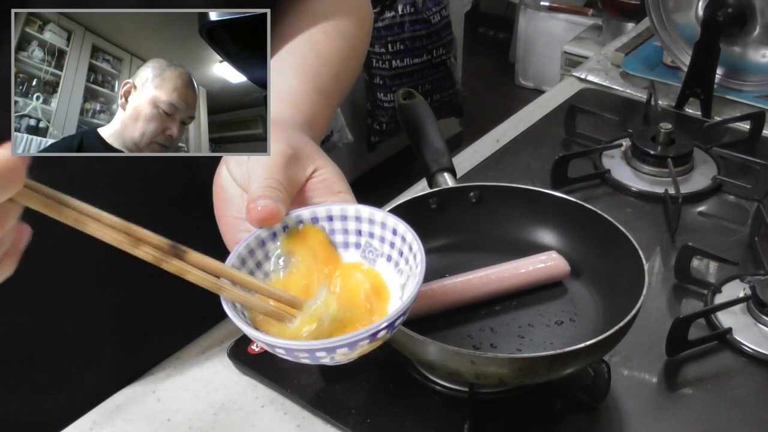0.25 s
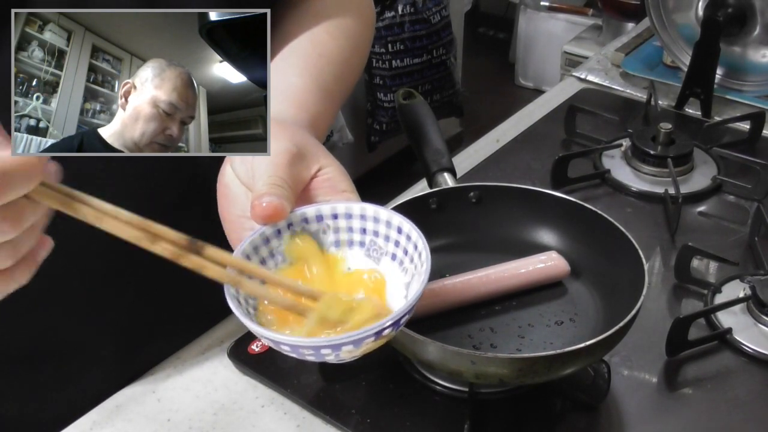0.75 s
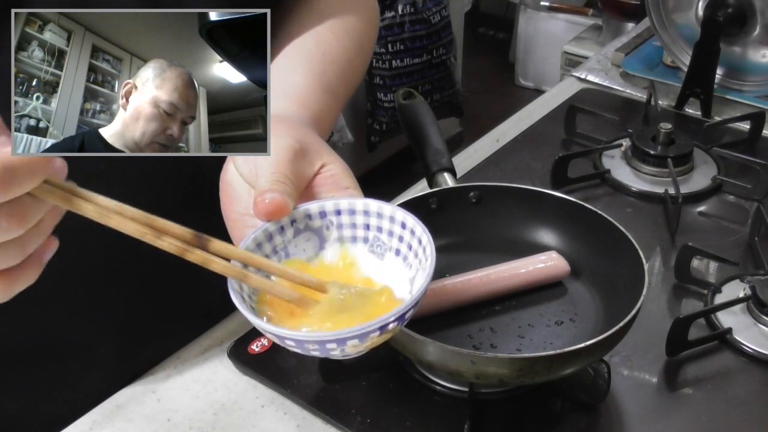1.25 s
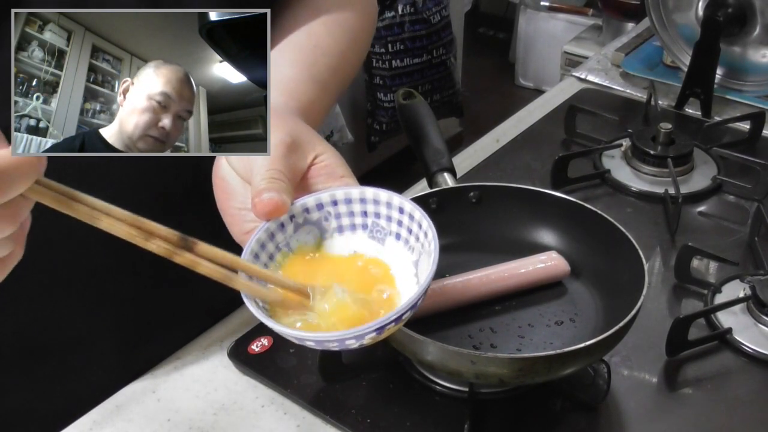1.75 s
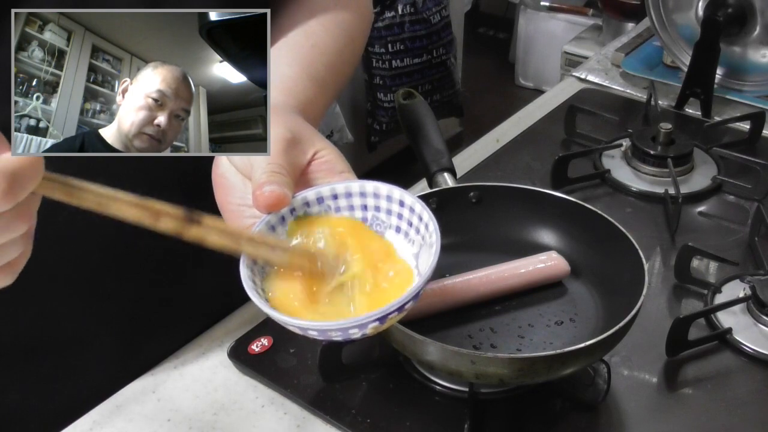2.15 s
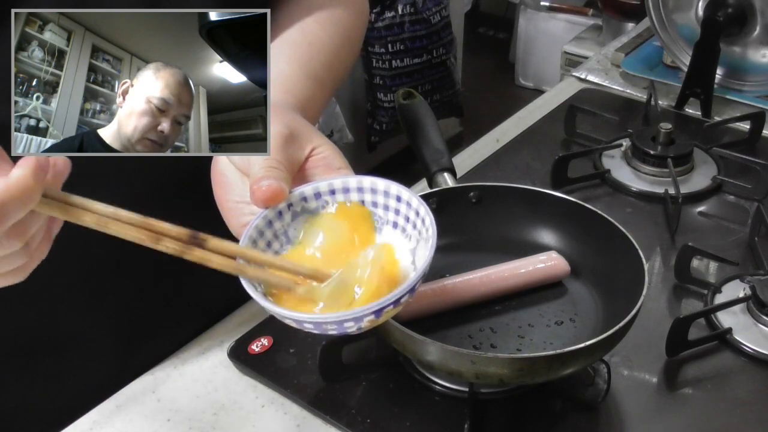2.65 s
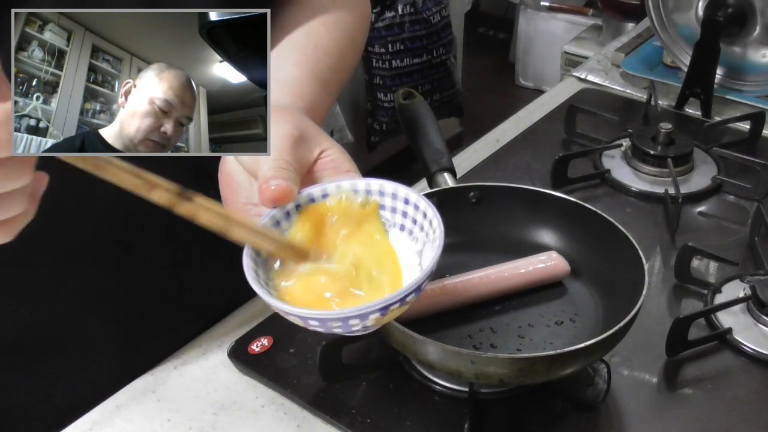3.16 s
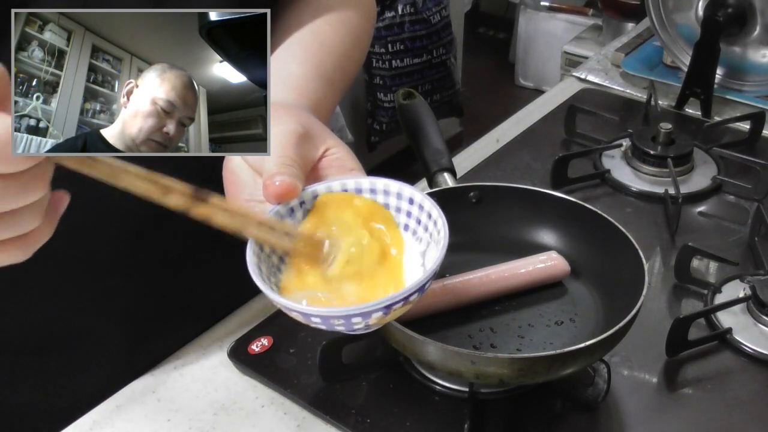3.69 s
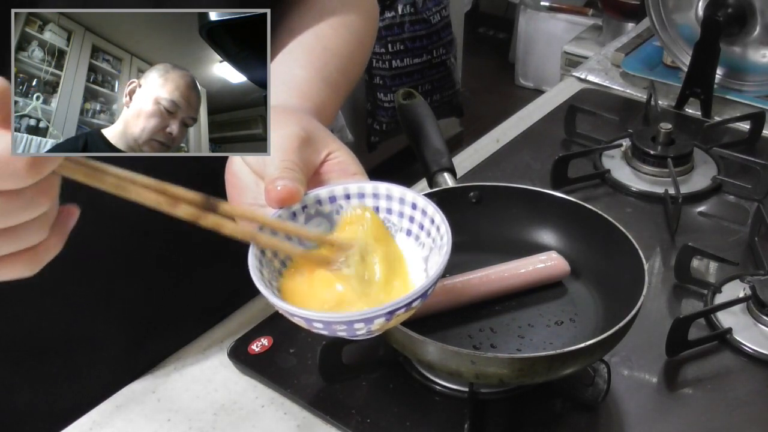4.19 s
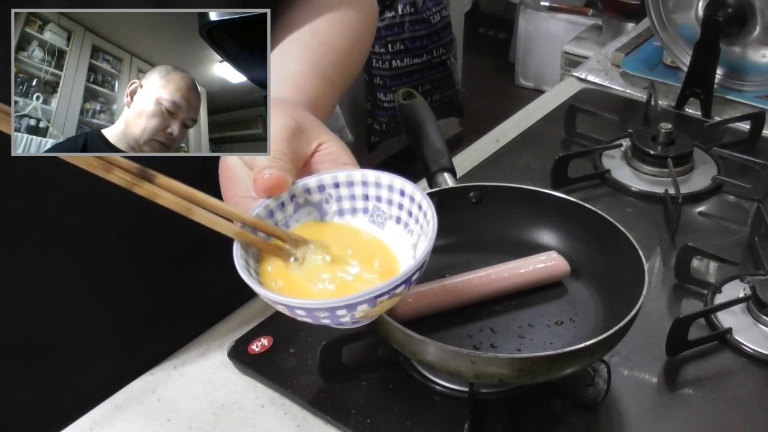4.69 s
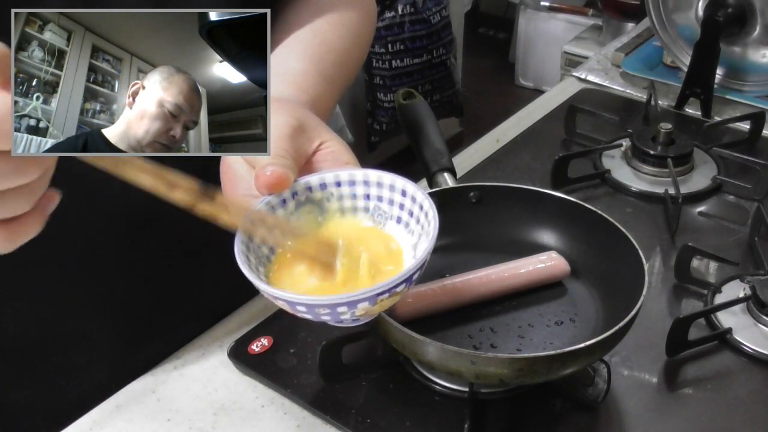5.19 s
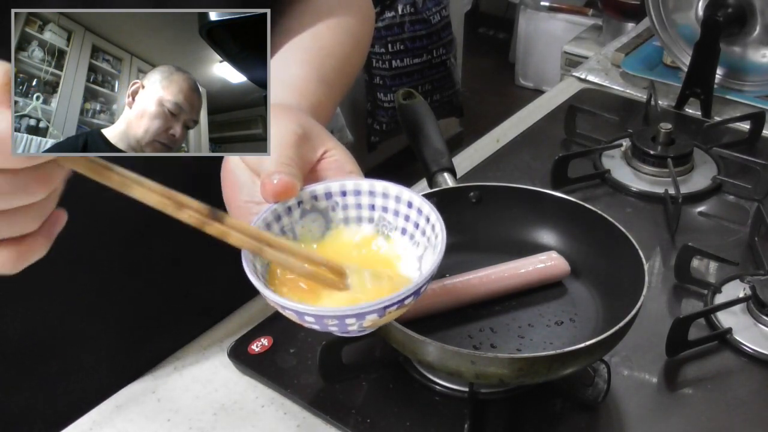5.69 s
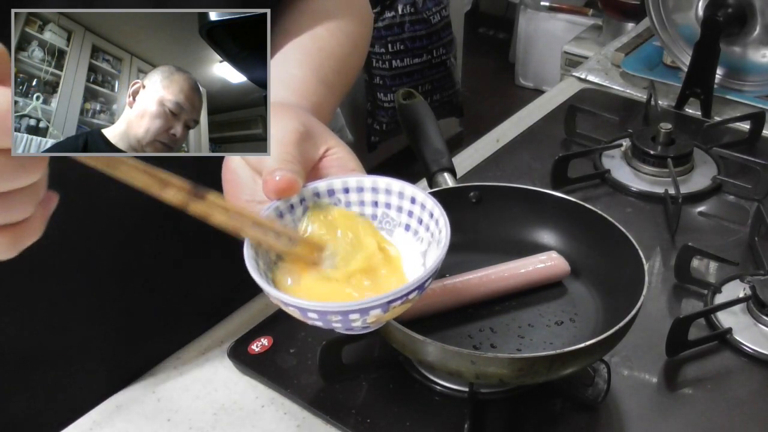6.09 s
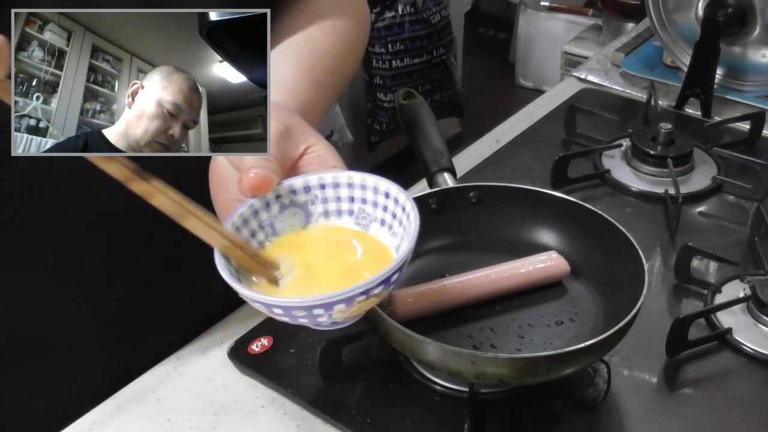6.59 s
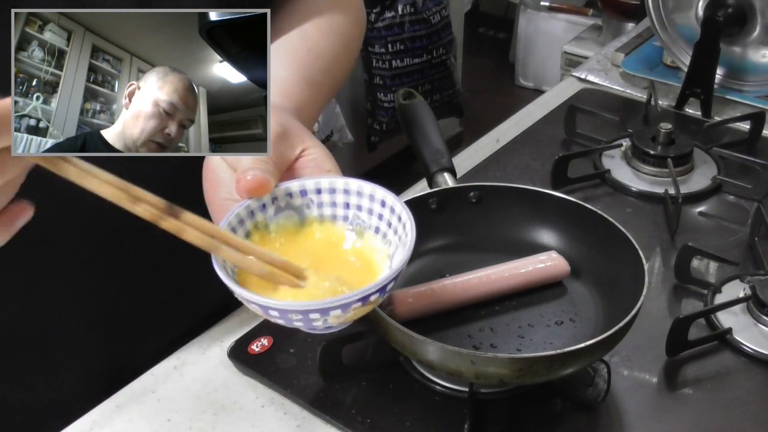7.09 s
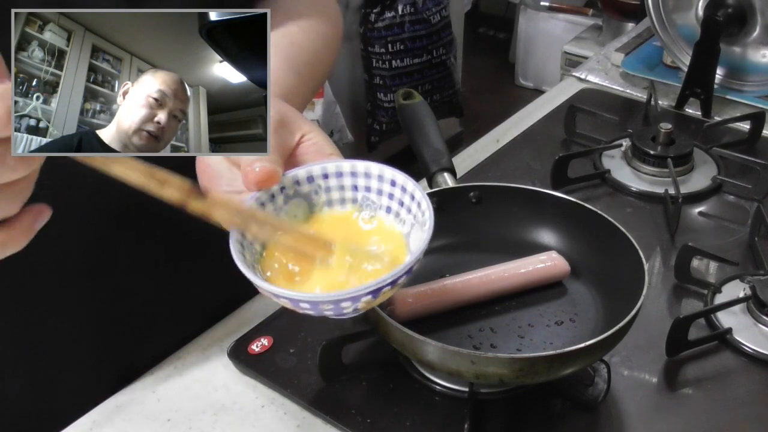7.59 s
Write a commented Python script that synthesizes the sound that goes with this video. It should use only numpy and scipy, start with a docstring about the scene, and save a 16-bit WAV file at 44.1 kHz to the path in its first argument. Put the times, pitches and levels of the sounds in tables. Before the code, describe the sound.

Oil sizzles in a frying pan from the start, a steady high fizz with fine crackle and scattered sharp spits. At once, wooden chopsticks begin beating a raw egg in a hand-held porcelain bowl, about six strokes a second. Each stroke is a bright, quickly damped click of varying strength, mixed with wet squelches, little slaps and gulps of air. Around 2.5 seconds the clicks pause while the egg keeps sloshing; the oil spits its loudest near 2.9 seconds, and the clicks return at 3. They pause again from about 4.5 to 5.1 seconds as the sizzle swells slightly, then run on until the end, near 8 seconds. A clear wet blip and another sharp spit come near 5.8 seconds. The bowl is close to the microphone, with the pan just behind it, and the small kitchen adds a short echo.

```python
"""Oil sizzles in a frying pan from the start, as countless tiny steam bubbles burst.
At once, wooden chopsticks begin beating a raw egg in a hand-held porcelain bowl, about six strokes
a second: the sticks click on the bowl and the egg gulps air. The clicks pause near 2.5 seconds,
the oil spits its loudest, and they return. They pause again near 4.5 seconds, then run to the end.
All along, a small kitchen echoes and the microphone's gain control tames the loudest clicks."""
import sys
import numpy as np
from scipy import signal
from scipy.fft import rfft, irfft
from scipy.io import wavfile
from scipy.ndimage import uniform_filter1d, minimum_filter1d

SR = 44100
rng = np.random.default_rng(int(sys.argv[2]) if len(sys.argv) > 2 else 0)


def wav_out(sig):
    """Save sig, one row per channel (or a flat mono array), as 16-bit PCM at SR to the path in sys.argv[1]."""
    wavfile.write(sys.argv[1], SR, np.round(np.clip(np.atleast_2d(sig).T, -1, 1) * 32767).astype(np.int16))


N = 346185

# The kitchen's echo. Each row: frequency in Hz, seconds to fade by 60 dB.
ECHO_TIMES = [(200, 0.16), (1500, 0.08), (4000, 0.27), (8000, 0.16), (16000, 0.17)]
# How the high fizz of the frying swells and sinks. Each row: time in seconds, level in dB.
FIZZ_LEVELS = [(0.0, -17), (0.16, -19), (0.5, -20), (1.3, -20.5), (1.9, -21.5), (2.57, -19), (3.0, -20),
               (3.2, -20.5), (4.2, -20.5), (4.72, -19), (4.92, -17), (5.1, -19), (5.6, -22), (6.0, -20),
               (6.33, -20), (6.65, -22), (7.15, -20.5), (7.85, -24)]
# The tone of that fizz. Each row: frequency in Hz, level in dB.
FIZZ_TONE = [(2800, -39), (4500, -20.5), (4900, -15.5), (5400, -13.5), (5850, -6), (7200, -1.5), (8100, -2),
             (9000, -3.5), (10500, -7.5), (11800, -13.5), (15500, -16)]
# How the wash, a lower rush of frying, swells and sinks. Each row: time in seconds, level in dB.
WASH_LEVELS = [(0.0, -30), (0.8, -32), (1.9, -34.5), (2.55, -29.5), (3.0, -33), (4.0, -34.5), (4.5, -31.5),
               (4.9, -31.3), (5.5, -34), (6.8, -36.5), (7.11, -33), (7.85, -39)]
# The tone of that wash. Each row: frequency in Hz, level in dB.
WASH_TONE = [(20, -22), (60, -26), (250, -28), (500, -24), (750, -20), (1000, -9.5), (1250, -7), (1450, -1),
             (2200, -0.5), (3200, -0.5), (4300, 2), (5000, 0.5), (6000, -7), (9000, -42)]
# Where the pan rings. Each row: frequency in Hz, width in Hz, boost in dB.
PAN_RESONANCES = [(1426, 250, 6.7), (1596, 87, 6.1), (2490, 260, 4.7), (2800, 140, 7.8), (3580, 330, 8.4),
                  (4105, 490, 5.4), (4830, 110, 5.1), (6460, 110, 3.4), (7800, 180, 2.1)]
# The main spits of the oil. Each row: start in seconds, strength in dB.
OIL_SPITS = [(0.0962, 10.5), (0.3173, 1), (0.4342, 0), (1.2223, 5.5), (1.654, 1.5), (2.1534, 10.5),
             (2.37, -6), (2.8936, 13), (2.9455, -2.5), (2.896, 14.5), (3.1773, -2), (4.115, 7),
             (4.8902, -13), (5.013, 5), (5.297, 2), (5.408, 2), (5.7658, 1.5), (5.8448, 10), (7.3473, -1),
             (7.427, 2), (7.8273, -2.5)]
# The tone of a spit. Each row: frequency in Hz, level in dB.
SPIT_TONE = [(50, -39), (700, -28), (1500, -37.5), (3000, -6), (5300, -0.5), (7500, 11.5), (10000, 5.5),
             (12000, -6), (15500, -4.5)]
# The loudest slaps of the sticks parting the egg. Each row: start in seconds, strength in dB.
EGG_SLAPS = [(.034, -18.5), (.251, -16), (2.724, -21.5), (2.853, -20.5), (3.527, -20), (3.704, -22),
             (3.928, -15), (4.047, -15.5), (4.108, -21), (4.858, -19), (4.977, -17), (5.996, -15.5),
             (6.104, -14), (6.678, -21), (7.339, -20.5)]
# The tone of a slap. Each row: frequency in Hz, level in dB.
SLAP_TONE = [(100, -44), (550, -26), (850, -12), (1300, -0.5), (1900, 7), (2400, -2), (3000, 3),
             (4200, -17), (8000, -15), (16000, -52)]
# The largest air pockets closing in the egg. Each row: start in seconds, level in dB, pitch in Hz,
# octaves the pitch climbs by the time the note is loudest.
AIR_POCKETS = [(0.253, -23.5, 1280, 0.035), (0.777, -18, 796, 0.21), (0.777, -12, 1220, 0.37),
               (0.799, -18.5, 1234, 0.041), (0.813, -20, 1820, .02), (0.913, -16, 1900, 0.003),
               (1.223, -7.5, 1905, 0), (1.512, -15.5, 1720, 0.14), (2.33, -15, 1630, 0.045),
               (2.343, -19, 1580, 0), (2.41, -17.5, 1860, 0), (2.434, -17, 1790, 0.022),
               (2.493, -14.5, 1926, 0.017), (2.655, -8.5, 1946, 0), (2.817, -13.5, 1990, 0),
               (2.838, -25, 790, 0.087), (2.85, -28, 738, 0), (3.617, -17.5, 1870, 0.0096),
               (3.738, -11, 1890, 0.064), (4.094, -28, 1020, 0.035), (4.21, -15, 1930, 0),
               (4.329, -19, 1305, 0), (4.373, -16.5, 2000, 0.029), (4.39, -14, 1800, 0.056),
               (5.313, -18.5, 1014, 0.032), (5.494, -38.5, 720, .02), (5.684, -20, 1570, 0.017),
               (5.824, -1, 1720, 0.08), (6.104, -20, 1970, 0.047), (7.239, -31, 894, .02),
               (7.598, -17, 1860, 0)]
# The sticks knocking on the bowl. Each row: start in seconds, strength in dB, share from 0 to 1 that
# rings the rim rather than the wood, extra dB for the bowl's low notes, damping (2 fades twice as
# fast), pitch of the wood in Hz.
STICK_KNOCKS = [(0.0836, -18, 0, -0.5, 1.7, 3320), (0.2281, -25.5, 0.6, -2, 1.2, 3250),
                (0.4005, -18.5, 1, -5, 2, 3270), (0.555, -19.5, 0.9, 0, 1.9, 2470),
                (0.718, -15, 0.3, -3.5, 1.7, 2780), (0.8811, -14.5, 0.5, -5, 3, 3360),
                (1.036, -17, 0.35, -8, 2.7, 3160), (1.184, -26, 0.2, -3, 1.1, 2830),
                (1.202, -14.5, 0.6, -6, 2.4, 2400), (1.3375, -22.5, 0, -15, 1.2, 2850),
                (1.365, -15.5, 0.36, -5.5, 1.5, 2770), (1.5292, -16.5, 0.23, -6, 1.2, 3410),
                (1.6922, -10, 0.4, -11.5, 1.26, 3580), (1.859, -22.5, 0.6, 1, 1.5, 2800),
                (2.0152, -27.5, 0.8, -5, 0.93, 2860), (2.179, -21, .6, -5, 1.3, 3360),
                (2.201, -27, .8, -15, 0.94, 3400), (2.224, -26, 0.1, -18, 2, 3380),
                (2.361, -21.5, 0.55, -4, .9, 3360), (2.9878, -24, 0.85, 1, 2, 3460),
                (3.18, -14, 0.88, -4, 2, 2320), (3.3911, -15.5, 0.96, -12, 1.15, 3350),
                (3.559, -10, 0.6, -9, 4.5, 3150), (3.733, -12.6, 0.32, -9, 1.6, 2710),
                (3.9108, -15.5, 0.26, -6.5, 1.7, 2730), (4.0867, -25.5, 0, -1.5, 2.4, 2710),
                (4.258, -28, .55, 5.5, 1.8, 2360), (4.4053, -18.5, 0.63, -5, 1.8, 3280),
                (5.148, -17, 0.84, -11.5, 1.7, 2980), (5.333, -15.5, 0.6, -13, 1, 3290),
                (5.44, -32, 0.3, 1, 3.3, 2650), (5.658, -20, 0.92, -5, 1.1, 2620),
                (5.805, -23.5, 0.8, -3, 1.3, 3260), (5.9824, -16.5, 0.7, -5.5, 2.9, 3400),
                (6.1393, -13, 0.04, -6.5, 1.44, 2482), (6.2588, -24.5, 0.6, -4, 2, 2800),
                (6.5729, -14.5, 0.74, -1.5, 1.8, 2610), (6.6634, -30.5, 0, 1, 1.7, 2750),
                (6.8895, -18.5, 0.9, -11, 0.76, 3070), (6.951, -24, .64, 1, 2.9, 2270),
                (7.0444, -16, 0.65, -1.5, 1.35, 2780), (7.1198, -27.5, 0.6, -2.5, 1.6, 3070),
                (7.209, -24, 0.8, -6.5, 2.1, 3000), (7.223, -18, 0.1, -8, 1.3, 3080),
                (7.3831, -23, 0.93, -9, 2, 2800), (7.405, -21, 0, -19, 0.92, 2696),
                (7.523, -26.5, .06, -1.5, 4.2, 2720), (7.6892, -17, 0.04, -4.5, 2.1, 2620),
                (7.764, -29.5, 0, -7, 1.4, 2620)]
# The bowl's own notes in three groups: low, rim and high. Close pairs make the sound waver.
# Each row: pitch in Hz, level in dB, seconds to fade by 60 dB when the damping is 1.
BOWL_NOTES = [
    [(1588, 5, 0.048), (1819, -3.5, 0.085), (1974, 15.5, 0.024)],
    [(2697, -11.5, 0.033), (3604, -2.5, 0.049), (3684, -2, 0.09)],
    [(6350, -6.5, 0.02), (6450, -15, 0.087), (7395, -9.5, 0.021)],
]
# The tone of the dry crack of wood on glaze. Each row: frequency in Hz, level in dB.
CRACK_TONE = [(100, -74), (700, -22), (1100, -13.5), (1600, -20), (3400, 4), (4300, -6), (5300, -10),
              (7500, -25), (11000, -33), (16000, -17)]
# The tone of the dull thud of an overloaded microphone. Each row: frequency in Hz, level in dB.
OVERLOAD_TONE = [(20, -7.5), (120, 1), (240, 0.5), (500, 4.5), (900, 1), (1500, -48), (4000, -15.5)]


def gain_of(db):
    """Turns decibels into a number to multiply a sound by."""
    return 10 ** (np.asarray(db) / 20)


def evened(x):
    """Scales a signal so that its average power is one."""
    return x / np.sqrt(np.mean(x ** 2) + 1e-20)


def value_at(table, hz):
    """Looks up a table by frequency, sliding between rows on a scale of octaves."""
    row_hz, value = np.transpose(table)
    return np.interp(np.log(hz + 1), np.log(row_hz + 1), value)


def gain_curve(levels):
    """Turns rows of time and dB into a gain for every sample."""
    return gain_of(np.interp(np.arange(N) / SR, *np.transpose(levels)))


def add(mix, start, sound):
    """Adds a sound into the mix at a start time in seconds."""
    part = mix[max(round(start * SR), 0):][:len(sound)]
    part += sound[:len(part)]


def tint(x, tone, resonances=()):
    """Gives a sound a tone and ringing peaks; white noise would keep its power."""
    hz = np.fft.rfftfreq(4096, 1 / SR)
    peaks_db = sum(db / (1 + (2 * (hz - centre) / width) ** 2) for centre, width, db in resonances)
    log_gain = np.log(gain_of(np.maximum(value_at(tone, hz) + peaks_db, -100)))
    mirrored = np.r_[log_gain, log_gain[-2:0:-1]]
    spectrum = np.exp(signal.hilbert(mirrored).conj())  # rings after a click, never before it
    taps = np.fft.ifft(spectrum).real[:len(hz)]
    return signal.oaconvolve(x, taps / np.linalg.norm(taps))[:len(x)]


def drift(rate_hz):
    """A random wobble, mostly slower than the given rate."""
    hz = np.fft.rfftfreq(N, 1 / SR)
    return evened(irfft(rfft(rng.standard_normal(N)) / (1 + (hz / rate_hz) ** 2), N))


def bursts(per_s, spread_db):
    """Tiny clicks at random times; a wide spread makes a few much louder than the rest."""
    size = gain_of(spread_db * (rng.exponential(1, N) % 3.6))
    return evened(size * rng.choice([-1, 1], N) * (rng.random(N) < per_s / SR))


def kitchen_echo(x, echoes_per_s=3000, near_db=7, near_s=0.0056):
    """Sound bounces strongly off the nearby hob and hood, then dies away in a short tail."""
    t = np.arange(SR // 2) / SR
    echoes = rng.choice([-1., 1.], len(t)) * (rng.random(len(t)) < echoes_per_s / SR)
    echoes *= (t > .002) * (1 + gain_of(near_db) * np.exp(-t / near_s))
    hz, times, spectra = signal.stft(echoes, SR, nperseg=256)
    fade = np.exp(-np.log(1000) * times / value_at(ECHO_TIMES, hz)[:, None])
    tail = signal.istft(spectra * fade, SR)[1]
    return signal.oaconvolve(x, tail / np.linalg.norm(tail))[:N]


def frying(fizz_db=-2.5, flutter_db=1.35, wash_db=1.14, sway_db=5.0, clump_db=3.5):
    """Countless steam bubbles blur into a fizz, nearer ones crackle in clumps, and both ring the pan."""
    clumps = drift(rate_hz=106)
    crackle = bursts(per_s=1000, spread_db=5.0) * gain_of(clump_db * clumps)
    crackle = evened(crackle + gain_of(-6) * kitchen_echo(crackle))
    snaps = evened(signal.lfilter([1, -0.99], 1, crackle))  # bursts at the surface keep their treble
    fizz_noise, wash_noise = rng.standard_normal((2, N))
    fizz = gain_of(fizz_db + flutter_db * clumps) * fizz_noise + gain_of(-3) * snaps
    sway = np.tanh(drift(rate_hz=25))
    wash = gain_of(wash_db + sway_db * sway) * wash_noise + gain_of(-9) * crackle
    high = gain_curve(FIZZ_LEVELS) * tint(fizz, FIZZ_TONE, PAN_RESONANCES)
    low = gain_curve(WASH_LEVELS) * tint(wash, WASH_TONE, PAN_RESONANCES)
    return high + low


def oil_spits(tick_db=9, spray_db=-25, spray_s=.003, overload_growth=2.44, small_count=28):
    """A water drop bursts in the oil with a sharp tick and a brief spray."""
    t = np.arange(0, .02, 1 / SR)
    ticks, overload = np.zeros((2, N))
    click = t == 0
    small_spits = [(rng.uniform(0, N / SR), rng.uniform(-8, -4)) for _ in range(small_count)]
    for start, db in list(OIL_SPITS) + small_spits:
        spray = rng.standard_normal(len(t)) * np.exp(-t / spray_s)
        add(ticks, start, gain_of(db + tick_db) * (click + gain_of(spray_db) * spray))
        # The loudest spits overload the microphone with a dull thud.
        add(overload, start, gain_of(-36 + overload_growth * db) * click)
    return tint(ticks, SPIT_TONE) + tint(overload, OVERLOAD_TONE)


def egg_squelch(level_db=-41.5, lead_s=.04, stroke_s=.13):
    """Many small wet blips, loudest while the sticks drag through the egg around each knock."""
    t = np.arange(0, .02, 1 / SR)
    blips, strokes = np.zeros((2, N))
    for start, *_ in STICK_KNOCKS:
        add(strokes, start - lead_s, signal.windows.hann(round(stroke_s * SR)))
    for hz in np.geomspace(1400, 3000, 20):
        age = t * hz / 1.3
        blip = age ** 2 * np.exp(-age) * np.sin(2 * np.pi * hz * t)
        gain = gain_of(-5 * abs(np.log2(hz / 1800)))  # 5 dB softer per octave away from 1800 Hz
        blips += gain * signal.oaconvolve(bursts(per_s=6, spread_db=0.5), blip)[:N]
    return gain_of(level_db) * evened(blips * (.5 + strokes))


def egg_slaps(level_db=-2, fade_s=0.0045, ticks_per_s=4000, fall_s=.076, fall_db=-28.5, spread_db=6.5):
    """Wet ticks as the sticks part the egg, as it falls back after a knock, and as a bubble starts."""
    t, slaps = np.arange(0, .03, 1 / SR), np.zeros(N)
    falls = [(start + fall_s, rng.normal(fall_db, spread_db)) for start, *_ in STICK_KNOCKS]
    bubble_starts = [(start, min(db, -11) - 3) for start, db, *_ in AIR_POCKETS]
    for start, db in list(EGG_SLAPS) + falls + bubble_starts:
        ticks = rng.standard_normal(len(t)) * (rng.random(len(t)) < ticks_per_s / SR)
        add(slaps, start, gain_of(db + level_db) * evened(ticks) * np.exp(-t / fade_s))
    return tint(slaps, SLAP_TONE)


def egg_bubbles(cycles_to_peak=5.45, wobble_octaves=0.024, lowest_hz=680):
    """Each air pocket rings a short note that wobbles with the egg and rises as it nears the surface."""
    t, notes = np.arange(0, .06, 1 / SR), np.zeros(N)
    slosh = drift(rate_hz=170)
    for start, db, hz, rise in AIR_POCKETS:
        age = t * hz / cycles_to_peak  # large, low pockets last longer
        swell = (age * np.exp(1 - age)) ** 2
        wobble = wobble_octaves * slosh[round(start * SR):][:len(t)]
        octaves = rise * np.minimum(age, 3) + wobble
        cycles = np.cumsum(hz * 2 ** octaves) / SR
        add(notes, start, gain_of(db) * swell * np.sin(2 * np.pi * cycles))
    bass_cut = signal.butter(8, lowest_hz, "high", fs=SR, output="sos")  # a steep filter removes bass
    return signal.sosfilt(bass_cut, notes)


def ringing(notes, damping, t, detune=0.009, spread_db=7.0, onset_s=0.0014):
    """Struck notes fade away; the sloshing egg shifts their pitch and level a little at every knock."""
    hz, db, fade_s = np.transpose(notes)[:, :, None]
    shift, size = rng.standard_normal((2, len(notes), 1))
    fade = np.exp(-np.log(1000) * t * damping / fade_s)
    onset = 1 - np.exp(-t / onset_s)
    waves = np.sin(2 * np.pi * hz * (1 + detune * shift) * t)
    return (gain_of(db + spread_db * size) * fade * onset * waves).sum(0)


def at_level(x, db, attack_s=.015):
    """Scales a sound so that its first moment has the given level."""
    attack = x[np.arange(len(x)) / SR < attack_s]
    return x * gain_of(db) / np.sqrt(np.mean(attack ** 2))


def bowl_knocks(wood_s=0.027, crack_s=0.0035, overload_s=0.0051, firm_db=-13, overload_growth=1.97):
    """Wood hits porcelain: a crack, a note from the sticks and a ring that hand and egg damp."""
    t = np.arange(0, .12, 1 / SR)
    rings, cracks, overload = np.zeros((3, N))
    # The second stick lands more softly, 3.4 to 24 milliseconds after the first.
    second_knocks = [(start + 0.0034 + 0.0206 * rng.random() ** 2, db - 16, *rest)
                     for start, db, *rest in STICK_KNOCKS]
    for start, db, rim_share, low_db, damping, wood_hz in list(STICK_KNOCKS) + second_knocks:
        rim_share = np.clip(rim_share, .01, .99)
        rim_db, wood_db = 10 * np.log10([rim_share, 1 - rim_share])
        wall_db = db + 0.21 * rim_db  # the bowl's wall only partly follows the rim
        group_levels = (db + low_db + 0.5, db + rim_db + 2, wall_db - 1)  # low, rim, high
        for notes, level in zip(BOWL_NOTES, group_levels):
            add(rings, start, at_level(ringing(notes, damping, t), level))
        stick_notes = [(wood_hz, 0, wood_s), (wood_hz * .91, -9, wood_s)]  # the two sticks differ
        add(rings, start, at_level(ringing(stick_notes, damping, t), db + wood_db + 1.3))
        grit = rng.standard_normal(len(t))
        add(cracks, start, at_level(grit * np.exp(-t / crack_s), db - 4))
        # Loud knocks overload the microphone, adding a faint low thud.
        thud = (t == 0) + 0.059 * grit * np.exp(-t / overload_s)
        add(overload, start, at_level(thud, -36.5 + overload_growth * (wall_db - firm_db)))
    return rings + tint(cracks, CRACK_TONE) + tint(overload, OVERLOAD_TONE)


def scene():
    """The bowl and egg are near the microphone, with the pan just behind them."""
    knocks = bowl_knocks()
    egg = egg_bubbles() + egg_squelch() + egg_slaps()
    spits = oil_spits()
    echo = kitchen_echo(gain_of(-10) * knocks + gain_of(-6.5) * egg + gain_of(-14) * spits)
    return (frying() + echo + spits + egg + knocks)[None]


def overshoot_db(x, ceiling_db, release_db_per_s):
    """How far the peaks pass a ceiling, in dB, sinking back at a steady rate after each one."""
    over_db = 20 * np.log10(np.maximum(abs(x) / gain_of(ceiling_db), 1))
    fall = np.arange(N) * release_db_per_s / SR
    held_db = np.maximum.accumulate(over_db + fall) - fall
    widened_db = -minimum_filter1d(-held_db, size=15)
    return uniform_filter1d(widened_db, size=15)


def record(dry, dip_share=0.13, clip_db=-0.8, top_hz=15780):
    """Gain control dips after loud clicks, peaks are held and clipped, and the top treble is cut."""
    x = dry[0]
    x = x / gain_of(dip_share * overshoot_db(x, ceiling_db=-2.5, release_db_per_s=58))  # gentle dip
    x = x / gain_of(overshoot_db(x, ceiling_db=0.9, release_db_per_s=900))  # fast limiter
    x = np.clip(x, -gain_of(clip_db), gain_of(clip_db))
    treble_cut = signal.firwin(611, top_hz, window=("kaiser", 8), fs=SR)
    return signal.oaconvolve(x, treble_cut, "same")[None]


dry = scene()
out = record(dry)
wav_out(out)
```